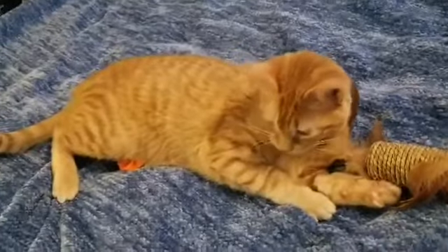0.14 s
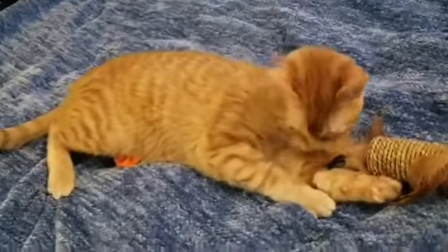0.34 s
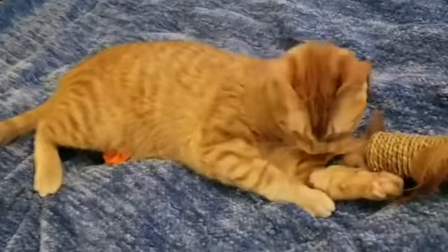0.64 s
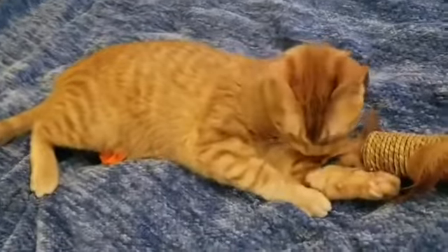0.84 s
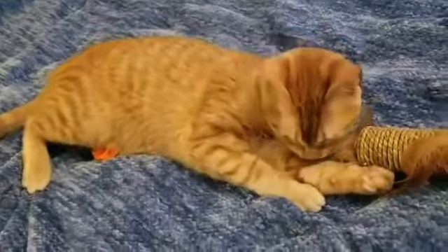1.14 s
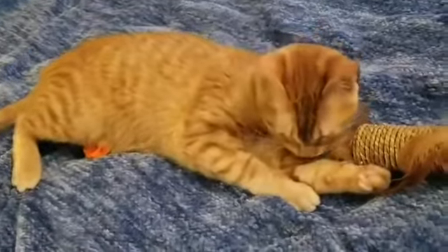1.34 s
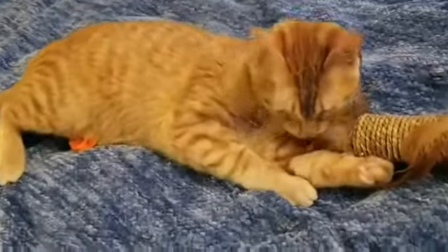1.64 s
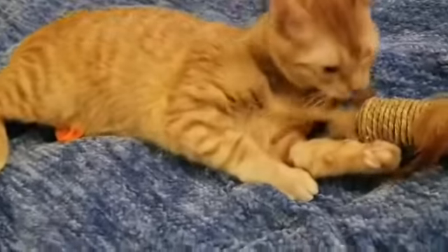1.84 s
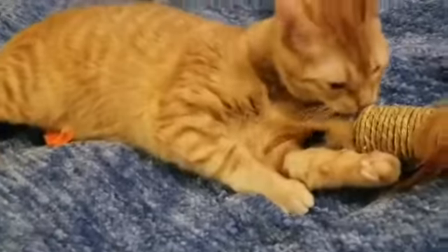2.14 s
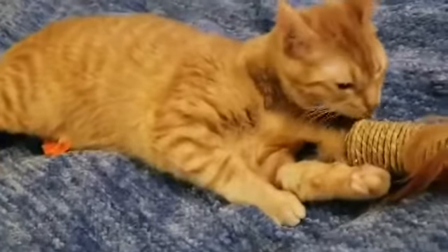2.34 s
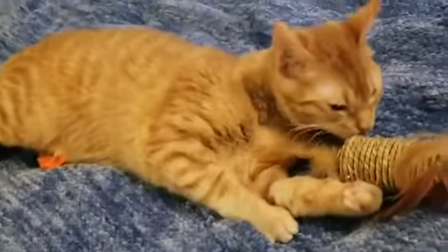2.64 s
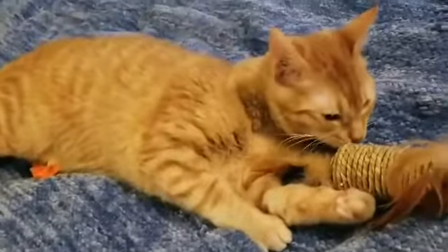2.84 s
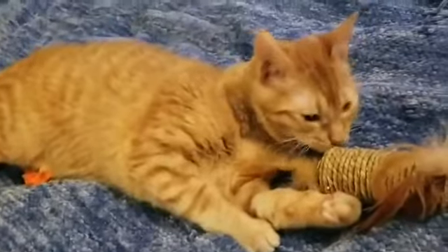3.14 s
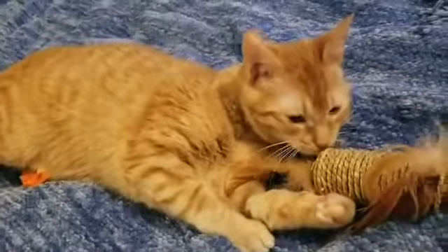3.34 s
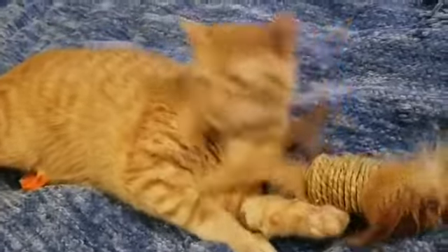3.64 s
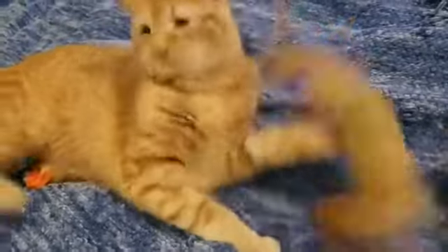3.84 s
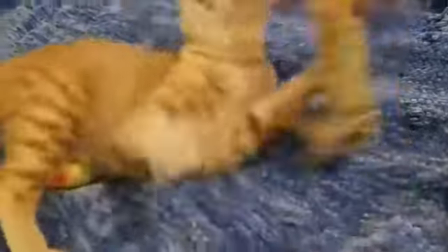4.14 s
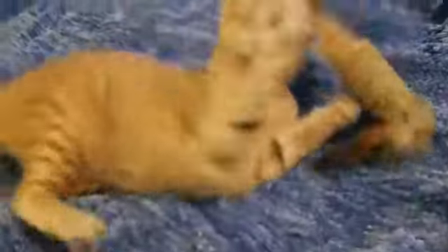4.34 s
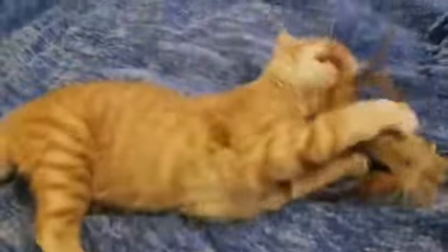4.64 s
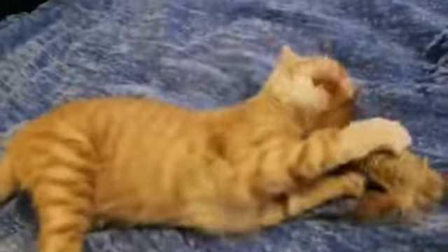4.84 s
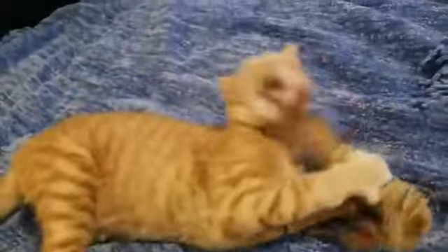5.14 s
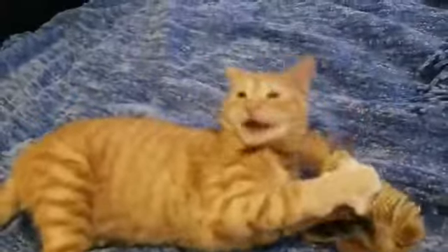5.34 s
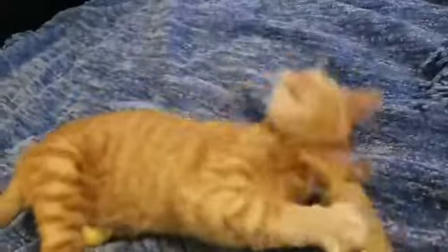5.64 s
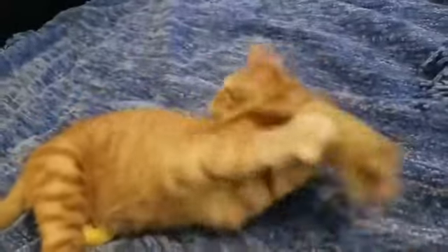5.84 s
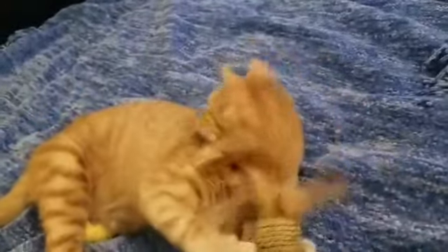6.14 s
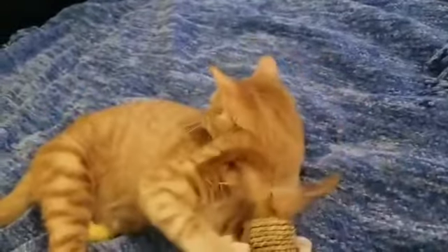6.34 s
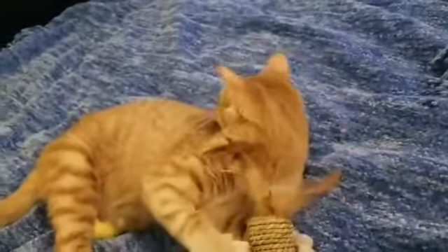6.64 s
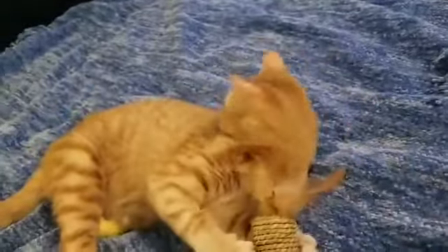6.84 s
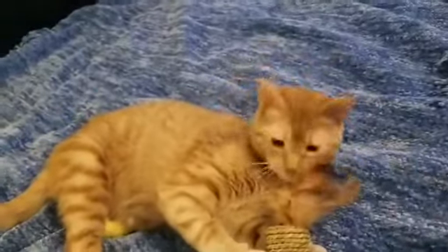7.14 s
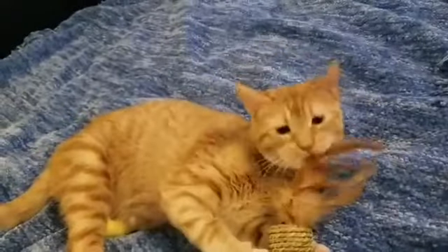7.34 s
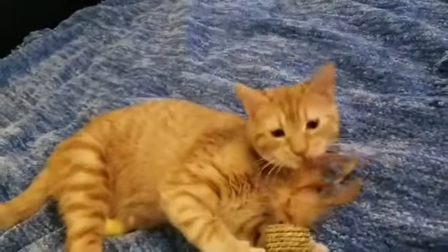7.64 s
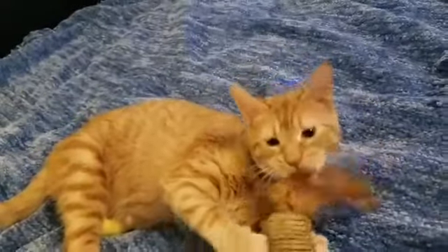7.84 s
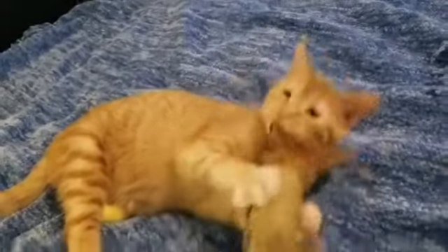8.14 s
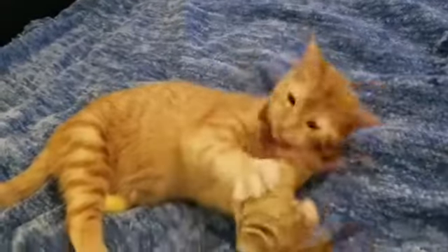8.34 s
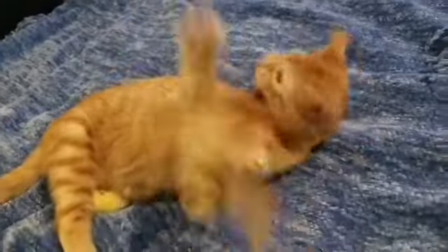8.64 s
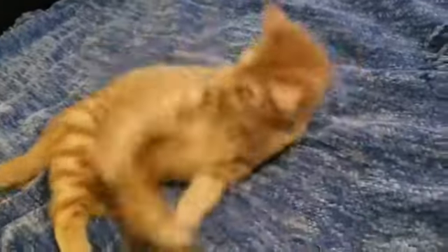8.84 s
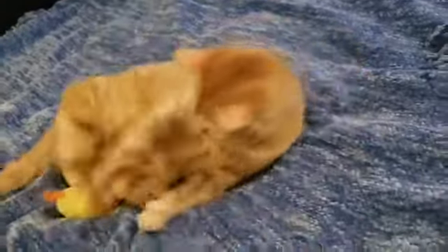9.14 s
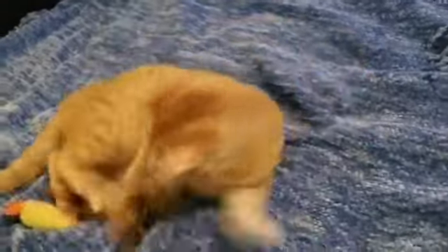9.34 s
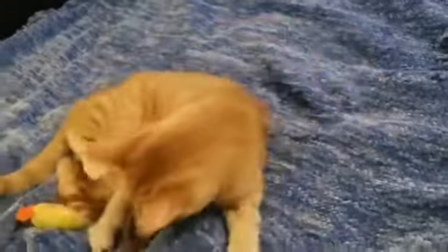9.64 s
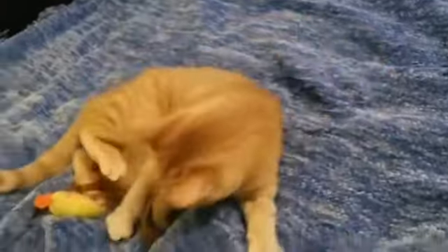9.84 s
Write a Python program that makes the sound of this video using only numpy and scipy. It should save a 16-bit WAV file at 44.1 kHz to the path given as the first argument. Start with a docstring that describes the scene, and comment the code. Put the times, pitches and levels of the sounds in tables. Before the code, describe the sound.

A tiny high bell jingles in bursts as a kitten wrestles a toy, with claws snapping on rope and light blanket rustling.

```python
"""Kitten with a belled toy

A kitten wrestles a feathered sisal toy on a blanket in a small room, close to a hand-held phone.
A pellet strikes and rolls inside a tiny bell, whose fur-damped shell chinks in bursts.
Claws pluck the rope and scratch the weave; feathers and cloth rustle by stick-slip friction.
The phone rubs and bumps in the hand, and an appliance hums in the background."""
import sys
import numpy as np
from scipy import signal
from scipy.fft import rfft, irfft, next_fast_len
from scipy.io import wavfile
from scipy.ndimage import uniform_filter1d

SR = 44100
rng = np.random.default_rng(int(sys.argv[2]) if len(sys.argv) > 2 else 0)


def file_out(sig):
    """Save sig as 16-bit WAV at sys.argv[1]."""
    # one column per channel
    cols = np.atleast_2d(sig).T
    # limit, then scale
    lim = np.clip(cols, -1, 1)
    pcm = np.round(lim * 32767).astype(np.int16)
    wavfile.write(sys.argv[1], SR, pcm)


N = 440118
TIME = np.arange(N) / SR

# Levels in the tables are relative: each source applies its own gains to them.
# Tones of the appliance. Each row: frequency in Hz, rms level in dB.
HUM_TONES = [(42, -70.5), (60, -67), (72.4, -66), (85, -69), (95.8, -67.5), (119.9, -52.5), (145, -68.5),
             (240, -84.5)]
# Spectra of the noises. Each row: frequency in Hz, spectral density in dB.
AIR_SPECTRUM = [(15, -25), (25, -18.5), (37, 9), (65, -5), (110, 5.5), (162, 4), (180, -5), (290, -8),
                (520, -24), (900, -28), (2100, -26), (2750, -31), (3700, -34.5), (5500, -21), (8500, -43),
                (12700, -22.5), (13400, -58.5)]
RUMBLE_SPECTRUM = [(15, -19.5), (32, 0.5), (52, 1), (110, 1.5), (165, 0.5), (230, -15), (400, -23),
                   (1000, -73)]
RUB_SPECTRUM = [(120, -19), (250, 6.5), (400, 2), (620, 0.5), (900, -8), (1150, -18), (1600, -13),
                (3000, -30)]
KNOCK_SPECTRUM = [(100, -61), (300, -11.5), (600, -2), (1000, -11), (1900, -17), (2300, -21.5), (2750, -16),
                  (3700, -25), (4300, -21.5), (5500, -33.5), (8000, -28.5), (12500, -24), (15000, -46.5)]
FEATHER_SPECTRUM = [(1200, -12), (2000, -4), (2800, 3.5), (3700, -3), (4500, 2.5), (5600, 1), (7200, -3),
                    (8600, -13.5), (10500, -6), (12500, 0), (14000, -11.5)]
CLOTH_SPECTRUM = [(150, -10), (330, -8.5), (560, -5.5), (750, -6), (1080, -4.5), (1350, -1.5), (1800, -4.5),
                  (2700, -11.5), (4000, -12.5)]
SCRAPE_SPECTRUM = [(2000, -22), (4000, -17.5), (5400, 4), (6300, -2), (7800, -6), (11000, -14),
                   (12500, -11.5), (14000, -26)]
# The hand shifts on the phone, and now and then the kitten's paws bump it. Each row: start and length in
# seconds, rumble and rub in dB.
GRIP_SHIFTS = [(0, 0.037, -43.5, -54.5), (.4, 0.21, -51.5, -62), (.65, 0.052, -50, -50.5),
               (.76, 0.65, -55.5, -66.5), (1.47, 0.2, -51, -54), (1.69, 0.12, -42.5, -60),
               (1.85, 0.53, -54.5, -70.5), (2.48, 0.21, -58.5, -71), (3.8, 0.081, -51, -77),
               (3.99, 0.14, -50.5, -61), (4.4, 0.02, -40.5, -56), (4.5, 0.18, -53, -69),
               (5.12, 0.42, -55, -69.5), (6.83, 0.08, -43, -60.5), (7.0, 0.093, -53, -69),
               (7.36, 0.079, -48, -58), (7.7, 0.33, -63, -69.5)]
# Soft bumps on the phone. Each row: start in seconds, knock, thud and tick in dB.
BUMPS = [(.668, -38, -56, -62), (1.742, -44.5, -36, -45), (2.127, -38, -35.5, -43), (2.139, -57, -38, -39),
         (2.166, -57, -32.5, -66), (2.342, -30.5, -25, -30), (2.354, -32, -19.5, -31),
         (2.403, -51, -34, -64)]
# Hollow modes of the phone's case. Each row: frequency in Hz, level in dB.
CASE_MODES = [(462, -3.5), (535, -3), (600, -2.5), (752, -6), (1040, -7), (1280, -12), (2660, -11.5),
              (2760, -12), (4300, -21)]
# The kitten bats, kicks and rolls. Each row: start and length in seconds, feathers and cloth in dB.
KITTEN_MOVES = [(0, 0.026, -57, -53.5), (.38, 0.022, -61.5, -58), (.48, 0.024, -52.5, -56.5),
                (.645, 0.048, -58, -48.5), (.77, 0.14, -59.5, -55.5), (.97, .04, -60, -62),
                (1.085, 0.041, -45.5, -57), (1.19, .14, -70.5, -67), (1.48, 0.17, -56, -57),
                (1.74, 0.024, -50, -54), (1.82, 0.12, -61.5, -63), (2.46, 0.13, -61, -64),
                (2.73, 0.17, -59.5, -67.5), (2.995, .1, -46, -60), (3.8, 0.13, -55, -69),
                (3.88, 0.032, -47, -65), (3.98, 0.079, -43, -53.5), (4.11, 0.19, -53, -54),
                (4.38, 0.028, -49.5, -52), (4.53, 0.039, -49, -57.5), (4.65, 0.052, -82, -55.5),
                (5.11, 0.13, -57, -66), (5.3, 0.43, -54.5, -62.5), (5.625, 0.035, -53.5, -58),
                (5.78, 0.17, -58, -69.5), (5.945, 0.064, -41.5, -59), (6.11, 0.023, -48, -51.5),
                (6.83, 0.17, -50, -59.5), (7.06, 0.082, -55.5, -80), (7.22, 0.15, -54.5, -68),
                (7.37, 0.063, -47.5, -60), (7.55, 0.06, -53.5, -71), (7.68, 0.048, -48, -75),
                (7.795, 0.24, -53.5, -77), (8.08, 0.051, -56, -84), (8.24, 0.032, -58, -83),
                (8.812, 0.027, -35.5, -40.5), (8.94, 0.043, -41, -51.5), (9.14, 0.041, -51.5, -57),
                (9.27, 0.12, -50, -52), (9.42, 0.083, -54.5, -51.5)]
# A claw drags over the weave. Each row: start and length in seconds, level in dB, resonance in Hz.
SCRATCHES = [(0.656, 0.037, -50, 854), (4.023, 0.042, -43.5, 1020), (4.124, .2, -57, 1060),
             (4.389, 0.025, -56, 1130), (4.64, 0.03, -63, 1250), (5.631, 0.04, -51, 1080),
             (6.14, 0.03, -47, 1060), (8.469, 0.089, -73.5, 2685), (8.648, .025, -62, 2780),
             (9.316, .06, -61, 1300), (9.422, 0.09, -54, 1270), (9.498, 0.06, -54.5, 1260)]
# Higher resonances of the weave. Each row: frequency and nominal width in Hz, level in dB.
WEAVE_MODES = [(2860, 490, -9.5), (3110, 130, -10), (4680, 350, -10.5), (5290, 430, -8.5)]
# Claws and teeth catch hard on the rope. Each row: start in seconds, levels of snap, body and
# bright edge in dB, left minus right in dB, pitch of the fibre in Hz.
ROPE_SNAPS = [(0.695, -34, -36.5, -37, -9, 5800), (0.788, -36, -62, -37, -1, 5040),
              (0.797, -40, -67, -33, -4.0, 4760), (0.831, -55, -58.0, -36.5, -5.0, 2390),
              (1.102, -29.5, -63, -32.0, -12.0, 5250), (1.747, -34.5, -65.0, -50.0, 5.0, 2840),
              (2.999, -28.5, -56.5, -28.5, -9, 5950), (3.616, -63, -68.0, -29.5, -2, 2690),
              (3.89, -37, -71, -46.5, -11.5, 2630), (3.95, -20.5, -51.5, -47, -1.5, 4320),
              (3.981, -19.5, -33.5, -27, -4.5, 4660), (3.993, -18.5, -43, -30, -1, 6150),
              (4.006, -21.5, -41, -42, -4.5, 4600), (4.017, -23.5, -39, -33.5, 1, 5190),
              (4.035, -22.5, -32, -25.5, -0.5, 2710), (4.053, -17.5, -34.5, -29.5, -2.5, 5860),
              (4.103, -40, -53, -45, -1.5, 4840), (4.217, -35.5, -46, -40.0, -8, 5570),
              (4.241, -32.5, -44, -35, -6, 4740), (4.53, -43, -65.0, -45, -11, 4220),
              (4.575, -40.5, -59.5, -54, -6, 5470), (5.045, -39, -71, -35.5, -5, 5700),
              (5.12, -36, -73.0, -37.5, 1.0, 4950), (5.148, -39, -54, -48.0, 1.0, 3810),
              (5.169, -31, -50, -27, 0, 3670), (5.206, -26.5, -61, -31, -7, 5070),
              (5.269, -32.0, -68.0, -37, 2, 5130), (5.311, -42, -72.0, -27, -1, 4440),
              (5.364, -39, -70.0, -35.0, -2, 5580), (5.437, -35.5, -68.0, -38.0, 10, 4350),
              (5.633, -37, -50.0, -35, -4.0, 2800), (5.65, -40, -45, -37, -2, 2780),
              (5.874, -36.5, -65.0, -39, -10, 4660), (5.95, -34.0, -64, -38, -6.0, 2840),
              (5.97, -28, -51.0, -38, -13, 3100), (5.987, -33, -56.0, -40.0, -12.0, 2970),
              (5.998, -33, -57.0, -46, -11.0, 2820), (6.024, -26, -62.0, -31, -9.0, 6100),
              (6.069, -33.5, -47.0, -40, 0, 3100), (6.122, -31, -65, -46.0, -5.0, 3130),
              (6.133, -34, -52, -36, -2.0, 2710), (6.152, -36.0, -53, -50, -3, 2560),
              (6.166, -30, -35, -44, -1.5, 2700), (6.827, -25, -69, -23, -4, 4820),
              (7.002, -24, -62, -29.0, -5, 3600), (7.203, -39, -70, -42, 3, 3640),
              (7.23, -36, -72.0, -37.0, -2.0, 4140), (7.267, -33.5, -64, -36, -2, 3620),
              (7.506, -32.5, -58.5, -40.5, -5.5, 2730), (7.526, -35.5, -66, -43, 4, 2680),
              (7.619, -37, -66, -58.5, -7, 2740), (7.698, -28, -64, -41, 0.0, 3600),
              (7.81, -34.5, -63, -38.0, -9, 3460), (7.817, -29, -65, -40, 2, 3600),
              (7.842, -31, -73, -45, 0.0, 3470), (7.864, -31, -72, -30, 2, 5950),
              (7.905, -32.0, -70.0, -44.0, -2.0, 4100), (7.942, -26.5, -70.0, -37, 1, 5100),
              (7.958, -21.5, -62, -34, -2.0, 5810), (8.018, -32.5, -73.0, -38, 6, 5840),
              (8.061, -30, -75, -39, -3, 4140), (8.539, -48, -78.0, -51, -2.5, 2710),
              (8.821, -34, -33.0, -37.5, -11.5, 2690), (8.827, -26, -44, -28.0, -7, 5940),
              (8.832, -24.5, -31, -36.5, -12, 3170), (8.835, -15, -27.5, -14.0, 1.5, 4940),
              (8.863, -40.5, -43, -23, -7, 2910), (8.947, -30.5, -34, -35, 0, 3100),
              (8.976, -25, -38.5, -46.5, 3, 3160), (9.155, -41.5, -64, -62.0, -21, 2970),
              (9.174, -35, -50.5, -61.0, 3, 2780), (9.276, -32.5, -44.0, -30, -5.0, 2730),
              (9.379, -38, -43, -41, 5, 2880)]
# The pellet rolls round the shell. Each row: start and length in seconds, ring and scrape in dB.
PELLET_ROLLS = [(0, 0.024, -39, -57), (.12, 0.033, -63, -48), (.23, 0.094, -50, -61), (.36, 0.05, -53, -53),
                (.645, 0.033, -52, -66), (.72, 0.052, -42, -60), (.98, 0.015, -42, -60),
                (1.12, 0.017, -60, -65), (1.19, 0.046, -64, -58), (1.47, 0.18, -49, -60),
                (1.73, 0.17, -50, -71), (1.92, 0.033, -42, -70), (2.75, 0.22, -46, -64),
                (3.03, 0.026, -40, -39), (3.15, 0.044, -45, -60), (3.3, 0.12, -56.5, -64),
                (5.24, 0.32, -54, -62), (6.35, 0.21, -55, -65), (6.64, 0.099, -60, -58),
                (6.73, 0.041, -50, -59), (6.89, 0.075, -43, -69), (7.1, .05, -37, -50),
                (7.37, 0.43, -49, -74), (7.73, 0.25, -40.5, -66), (8.07, 0.095, -55.5, -63)]
# The pellet strikes the shell. Each row: start in seconds, levels of upper modes, lower modes,
# contact tick and bright top in dB, time for the upper modes to fall 60 dB in seconds.
PELLET_STRIKES = [(0.042, -29, -42, -47, -32, 0.064), (0.078, -44, -38, -45, -50, 0.032),
                  (.103, -13, -36, -28, -19.5, .018), (.114, -26, -46, -32.5, -35, 0.02),
                  (0.152, -19, -50, -45, -39, 0.045), (.163, -17.5, -43, -35, -60, 0.05),
                  (0.211, -37, -41, -45, -37, 0.023), (0.226, -50, -55, -43, -52, .02),
                  (0.243, -46, -61, -44, -62, .03), (.344, -35, -53, -49, -41, 0.029),
                  (0.381, -40, -38, -42, -48, 0.022), (0.4, -42, -47, -44, -36, 0.015),
                  (0.464, -32, -30, -47, -44, 0.0059), (0.629, -30.5, -40, -38, -53, 0.034),
                  (0.654, -26.5, -56, -47, -67, 0.073), (.648, -28, -46, -52, -50, 0.044),
                  (0.68, -31.5, -43, -50, -58, 0.046), (.737, -39, -38, -55, -65, .045),
                  (.773, -43, -44, -37, -52, 0.039), (.854, -15, -29, -25.5, -13.5, 0.037),
                  (.876, -46, -34, -32, -39, .03), (.937, -25.5, -29, -37, -46, 0.032),
                  (0.972, -41, -47, -31.5, -36, 0.012), (0.993, -37, -53, -43, -60, .02),
                  (1.001, -34, -44, -34, -57, .025), (1.054, -35, -55, -42, -51, 0.033),
                  (1.125, -48, -48, -47, -52, .02), (1.131, -34, -48, -55, -56, .03),
                  (1.145, -29.5, -40, -49, -32, 0.052), (1.189, -34, -35, -40, -36, 0.033),
                  (1.232, -32.5, -45, -39, -30, .03), (1.238, -37, -46, -39.5, -35, .02),
                  (1.261, -37, -58, -34, -31, 0.013), (1.289, -20, -33, -30, -39, 0.021),
                  (1.315, -31.5, -45, -40, -61, 0.029), (1.326, -40, -54, -40.5, -64, 0.022),
                  (1.431, -40, -59, -39, -35, 0.016), (1.508, -36.5, -23, -41, -30, 0.054),
                  (1.569, -41, -37, -60, -65, 0.064), (1.611, -25, -43, -46, -46, 0.033),
                  (1.62, -34, -45, -40.5, -54, 0.033), (1.708, -31.5, -33, -41.5, -49, 0.068),
                  (1.838, -32.5, -41, -52, -60, 0.053), (2.737, -34, -46, -42, -36, 0.018),
                  (2.746, -26, -43, -39, -48, 0.015), (2.85, -25.5, -31, -35, -31, 0.019),
                  (2.866, -31, -46, -44, -47, 0.13), (2.897, -28, -46, -47, -45, 0.047),
                  (2.911, -32, -36, -43, -46, .06), (2.952, -23.5, -46, -42, -53, 0.022),
                  (3.004, -19.5, -20, -28, -23, 0.035), (3.011, -22, -25, -24.5, -18, 0.02),
                  (3.021, -16, -27, -30, -28, 0.16), (3.056, -18.5, -34, -36, -36.5, 0.051),
                  (3.072, -32, -30, -32, -24, 0.033), (3.096, -29, -46, -50, -44, 0.025),
                  (3.129, -11, -24, -34, -20, 0.045), (3.224, -26, -38, -40.5, -37, 0.036),
                  (5.212, -37, -33, -24.5, -33, .04), (5.23, -49, -33, -41, -33, .04),
                  (5.295, -27, -42.5, -31.5, -18, 0.015), (5.334, -31.5, -50, -40, -30, 0.061),
                  (5.449, -34.5, -60, -44, -37, 0.033), (5.484, -33, -57, -55, -59, 0.066),
                  (5.551, -27, -58, -44, -40, 0.04), (6.371, -54, -61, -56, -60, .03),
                  (6.392, -45, -57, -47, -46, 0.041), (6.418, -48, -56, -47, -60, .04),
                  (6.466, -39, -36, -49, -44, 0.049), (6.493, -49, -51, -41, -57, .02),
                  (6.506, -39, -49, -41, -46, 0.022), (6.517, -56, -56, -42, -56, .02),
                  (6.603, -41, -54, -32, -40, 0.02), (6.642, -49, -56, -43, -52, .02),
                  (6.648, -44, -55, -44, -49, .02), (6.659, -35, -50, -34, -39, .02),
                  (6.667, -38, -54, -42, -46, 0.023), (6.685, -48, -52, -50, -44, .02),
                  (6.692, -39, -34, -29.5, -34, 0.014), (6.709, -46, -47, -33.5, -39, .025),
                  (6.727, -37, -46, -44, -41, .04), (6.744, -38, -54, -45, -52, 0.049),
                  (6.8, -35, -40, -42, -41, 0.028), (6.807, -34, -54, -62, -37, 0.027),
                  (6.821, -29, -32, -35, -29, 0.042), (6.853, -19, -15.5, -34, -23, 0.049),
                  (6.877, -16.5, -23, -49, -35, 0.037), (6.907, -28, -46, -50, -49, .04),
                  (6.936, -26, -48, -22.5, -22, 0.017), (6.944, -19, -14.5, -22.5, -24, 0.026),
                  (6.967, -28, -29, -27.5, -27, 0.066), (6.982, -28, -37.5, -45, -33, .04),
                  (6.992, -34, -39, -48, -47, .03), (7.031, -29.5, -40, -32.5, -33, 0.029),
                  (7.061, -24, -43, -32.5, -32, 0.059), (7.075, -30, -40, -55, -39, 0.035),
                  (7.097, -24, -27, -29, -28, 0.037), (7.112, -25.5, -27, -34, -28, 0.047),
                  (7.133, -35, -37, -35, -44, .03), (7.14, -29, -31, -41, -40, 0.021),
                  (7.225, -34, -45, -36.5, -47, 0.031), (7.243, -39, -34, -43, -44, 0.027),
                  (7.28, -37, -36, -45, -31, 0.044), (7.334, -42, -41, -35.5, -43, 0.056),
                  (7.347, -37, -41, -52, -55, 0.037), (7.389, -25, -41.5, -35.5, -32, 0.03),
                  (7.397, -31, -42, -52, -45, 0.02), (7.413, -40, -28, -39, -33, 0.017),
                  (7.433, -23, -39, -45, -30, .04), (7.445, -31, -45, -44, -39, 0.031),
                  (7.512, -28, -49, -47, -40, 0.058), (7.53, -30, -50, -33, -34, 0.026),
                  (7.559, -27, -43, -33, -38, 0.037), (7.567, -28, -44, -34, -35, 0.034),
                  (7.586, -36, -54, -44, -56, .025), (7.634, -29, -46, -36, -29, 0.045),
                  (7.671, -32, -47, -46, -50, .025), (7.688, -22.5, -33, -29.5, -29, 0.049),
                  (7.716, -9.5, -28, -27.5, -25, 0.046), (7.735, -17, -35, -52, -29, .03),
                  (7.764, -45, -51, -50, -36, .03), (7.796, -38, -25, -34, -32, 0.041),
                  (7.816, -34, -39, -37, -39, .025), (7.873, -37, -52, -36, -47, .025),
                  (7.887, -37, -41, -41, -40, 0.033), (7.921, -25.5, -50, -32.5, -25, 0.046),
                  (7.99, -40, -54, -51, -45, 0.033)]
# Modes of the bell: two ringing groups, then the quickly damped clink and its bright top.
# Each row: frequency in Hz, level in dB.
UPPER_MODES = [(9812, 0), (9960, -13), (9500, -19), (9800, -16)]
LOWER_MODES = [(8835, 23), (8925, -5.5), (9090, -8)]
CLINK_MODES = [(5210, -5.5), (5420, -3.5), (5720, -5), (6100, -11.5), (7540, -13.5)]
TOP_MODES = [(11150, -2.6), (11850, -2), (12400, 0), (12800, -2)]
# Where the bell lies between the microphones. Each row: time in seconds, left minus right in dB.
BELL_PATH = [(0, -8), (.9, -8), (1.15, -3), (1.55, -6), (1.8, 7), (2.75, 0), (3.05, 3.5), (5.4, 12.5),
             (6.9, 5.5), (7.5, 9.5), (8.0, 1)]
# Resonances of the right microphone port. Each row: frequency and width in Hz, level in dB.
PORT_RESONANCES = [(2590, 630, 6.5), (4420, 170, -2), (6240, 820, -14)]
# The phone's treble roll-off. Each row: frequency in Hz, gain in dB.
TREBLE_RESPONSE = [(0, 0), (13000, 0), (13500, -11), (14500, -19), (16000, -32), (SR / 2, -60)]

BODY_HZ, SNAP_HZ, ROPE_HZ = (820, 1400), (2400, 7000), (2900, 6800)
EDGE_HZ, TOP_HZ = (8000, 13400), (11000, 13400)
RELEASE_DB_PER_S, QUICK_STOP_DB_PER_S = 159.5, 320


def undb(db):
    """Amplitude ratio of a level in decibels."""
    return 10 ** (np.asarray(db) / 20)


def unit(x):
    """Normalisation to rms 1."""
    return x / np.sqrt(np.mean(x ** 2))


def unit_peak(x):
    """Normalisation to the power of a unit sine over the loudest millisecond."""
    return x / np.sqrt(2 * uniform_filter1d(np.mean(x ** 2, axis=0), size=44).max())


def pan(left_db):
    """Constant-power panning: two gains that differ by left_db."""
    gains = undb(np.array([[.5], [-.5]]) * left_db)
    return gains / np.sqrt(np.mean(gains ** 2, axis=0))


def noise(size, side_db):
    """White stereo noise; the weaker its side part, the more coherent the channels."""
    mid, side = rng.standard_normal((2, size))
    return unit(mid + undb(side_db) * side * np.array([[1], [-1]]))


def colour(x, spectrum):
    """Spectral shaping, interpolated over log frequency, to rms 1."""
    hz, db = np.transpose(spectrum)
    size = next_fast_len(x.shape[-1])
    bins_hz = np.maximum(np.arange(size // 2 + 1) * SR / size, 1)
    gain = undb(np.interp(np.log(bins_hz), np.log(hz), db, right=-80))
    return unit(irfft(rfft(x, size) * gain, size)[..., :x.shape[-1]])


def band(x, lo_hz, hi_hz):
    """Causal band-pass filtering."""
    return signal.sosfilt(signal.butter(2, [lo_hz, hi_hz], "band", fs=SR, output="sos"), x)


def resonate(x, hz, width_hz):
    """Forced response of one resonator, gain 1 at its centre."""
    return signal.lfilter(*signal.iirpeak(hz, hz / width_hz, fs=SR), x)


def relax(pulses, decay_s):
    """Exponential relaxation after each pulse, with time constant decay_s."""
    return signal.lfilter([1], [1, -np.exp(-1 / (decay_s * SR))], pulses)


def add(out, at, sound):
    """Superposition of a sound at a time in seconds."""
    i = max(int(at * SR), 0)
    out[:, i:i + sound.shape[-1]] += sound[:, :max(N - i, 0)]


def crack(band_hz, t60, side_db):
    """A transient: exponentially decaying noise confined to one band."""
    t = TIME[:SR // 20]
    return unit_peak(band(noise(len(t), side_db) * undb(-60 * t / t60), *band_hz))


def contact(band_hz, t60, rattle=0.85):
    """A hard impact divides its energy between an instant click and a short rattle."""
    click = crack(band_hz, t60=.0045, side_db=-2)
    return np.sqrt(1 - rattle ** 2) * click + rattle * crack(band_hz, t60, side_db=-2)


def ring(modes, t60, detune=0.0027, phase_rad=1.0, rise_s=0.00069, uneven_db=0):
    """Free vibration: modes decay together, each reaching the two ports with its own phase."""
    t = TIME[:int(SR * np.clip(t60, .01, .2))]
    hz, db = np.transpose(modes)
    mistuning, onset, skew, spot = rng.standard_normal((len(hz), 4)).T
    phase = 2 * np.pi * (hz * (1 + detune * mistuning))[:, None] * t + onset[:, None]
    gains = undb(db + uneven_db * spot)  # the struck spot favours some modes
    ports = np.array([gains @ np.sin(phase + sign * phase_rad * skew[:, None]) for sign in (1, -1)])
    return unit_peak(ports * undb(-60 * t / t60) * (1 - np.exp(-t / rise_s)))


def impulses(per_s, spread_db, cap):
    """A Poisson train of impulses whose levels span cap times spread_db."""
    sizes = undb(spread_db * np.minimum(rng.exponential(size=N), cap))
    return sizes * (rng.random(N) < per_s / SR)


def friction(per_s, spread_db, smooth_db, side_db):
    """Stick-slip friction: many tiny slips of uneven size over a smooth hiss."""
    slips = relax(impulses(per_s, spread_db, cap=4), decay_s=.0008)
    return noise(N, side_db) * (unit(slips) + undb(smooth_db))


def gesture(start, length, release_db_per_s, attack_s=0.0056, slacken_db=3):
    """Envelope of a movement: a quick rise, a slackening hold and an exponential decay."""
    t = TIME - start
    fall_db = slacken_db * np.clip(t / length, 0, 1) + release_db_per_s * np.clip(t - length, 0, 1)
    return np.clip(t / attack_s, 0, 1) * undb(-fall_db)


def envelopes(moves, release_db_per_s=RELEASE_DB_PER_S):
    """Incoherent movements add in power, giving an envelope for each of their two levels."""
    power = np.zeros((2, N))
    for start, length, *levels_db in moves:
        power += np.outer(undb(levels_db), gesture(start, length, release_db_per_s)) ** 2
    return np.sqrt(power)


def background(air_db=-59.5):
    """Steady mains and motor tones lie over the room's air noise, most coherent in the bass."""
    hum = sum(np.sqrt(2) * undb(db) * np.sin(2 * np.pi * (hz * TIME + rng.random()))
              for hz, db in HUM_TONES)
    mid, side = rng.standard_normal((2, N))
    side = undb(-8) * side + undb(-2.5) * band(side, 450, 16000)
    return hum + undb(air_db) * colour(mid + side * np.array([[1], [-1]]), AIR_SPECTRUM)


def hand():
    """Structure-borne sound: skin rubs the phone, and bumps shake it and excite its case modes."""
    rumble = colour(noise(N, side_db=-30), RUMBLE_SPECTRUM)
    rub = colour(friction(per_s=300, spread_db=1.55, smooth_db=-2.6, side_db=-15.5), RUB_SPECTRUM)
    rumble_gain, rub_gain = envelopes(GRIP_SHIFTS)
    out = rumble * rumble_gain + rub * rub_gain
    t = TIME[:SR // 2]
    knock_t60, thud_t60, thud_rise_s = 0.25, 0.33, 0.002
    for at, knock_db, thud_db, tick_db in BUMPS:
        knock = colour(noise(len(t), -6), KNOCK_SPECTRUM) * undb(knock_db - 7 - 60 * t / knock_t60)
        thud = colour(noise(len(t), -26), RUMBLE_SPECTRUM) * undb(thud_db - 3 - 60 * t / thud_t60)
        add(out, at, knock + thud * (1 - np.exp(-t / thud_rise_s)))
        add(out, at, undb(knock_db) * ring(CASE_MODES, t60=0.13, detune=0.0077, phase_rad=0.24))
        tick = undb(-3) * crack(SNAP_HZ, t60=0.015, side_db=5.4) + crack(EDGE_HZ, t60=0.018, side_db=2)
        add(out, at, undb(tick_db) * tick)
    return out


def room(x, t60=0.16, wet_db=-15):
    """Reverberation: a small furnished room adds a short diffuse tail, different in each channel."""
    t = TIME[:SR // 2]
    tail = rng.standard_normal((2, len(t))) * undb(-60 * t / t60) * (t > .004)
    tail /= np.sqrt(np.sum(tail ** 2, axis=1, keepdims=True))
    return x + undb(wet_db) * signal.fftconvolve(x + x[::-1] / 2, tail, axes=1)[:, :N]


def flicker(x, per_s, depth_db=5.52):
    """Random amplitude modulation: ever new fibres touch, so each band swells and fades by itself."""
    size = next_fast_len(N)
    spectrum, hz = rfft(x, size), np.arange(size // 2 + 1) * SR / size
    centres_hz = np.geomspace(500, 13000, num=14)
    out = np.zeros((2, N))
    for weights in np.eye(len(centres_hz)):
        part = irfft(spectrum * np.interp(hz, centres_hz, weights), size)[:, :N]
        knots_db = depth_db * rng.standard_normal(int(N / SR * per_s) + 2)
        out += part * undb(np.interp(TIME * per_s, np.arange(len(knots_db)), knots_db))
    return unit(out)


def rustle(feather_gain, cloth_gain, still_s=9.6):
    """Friction noise: feathers and rope crackle while the body drags over the blanket."""
    # between moves the fur still brushes lightly, until the kitten lies still
    restless = np.interp(TIME, [still_s, still_s + 0.04], [1, 0])
    feather_gain = np.hypot(feather_gain, undb(-67) * restless)
    cloth_gain = np.hypot(cloth_gain, undb(-73.5) * restless)
    # light contact is a smooth brushing; hard contact breaks into slips
    grip = np.clip(feather_gain / undb(-60.5), 0, 1)
    slips = unit(friction(per_s=600, spread_db=2.3, smooth_db=-4, side_db=-1))
    texture = grip * slips + np.sqrt(1 - grip ** 2) * noise(N, side_db=-0.11)
    feathers = flicker(colour(texture, FEATHER_SPECTRUM), per_s=40)
    drag = friction(per_s=300, spread_db=1.8, smooth_db=1, side_db=-2.5)
    blanket = flicker(colour(drag, CLOTH_SPECTRUM), per_s=28)
    return undb(-1) * (feathers * feather_gain + blanket * cloth_gain)


def twang(hz):
    """A plucked fibre vibrates for an instant at its pitch and at a weaker, random one."""
    return ring([(hz, 0), (rng.uniform(*SNAP_HZ), -6)], t60=.009, rise_s=.0001)


def claw_catches(effort, per_s=10, scatter_db=8, limit_db=-52):
    """Random plucking: claws catch the rope, more strongly as the kitten works harder, up to a limit."""
    out = np.zeros((2, N))
    sides = pan(left_db=-2)
    for when, *sizes in rng.random((int(N / SR * per_s), 4)):
        at = when * N / SR
        strength = min(effort[int(when * N)], undb(limit_db))
        snap, edge, body = strength * undb(np.array([-2, -5, -14]) + scatter_db * np.array(sizes))
        click = edge * contact(EDGE_HZ, t60=0.012) + body * crack(BODY_HZ, t60=0.0066, side_db=-0.5)
        add(out, at, click * sides)
        add(out, at, snap * twang(rng.uniform(*ROPE_HZ)) * sides)
    return out


def scratches(threads_per_s=220, spread_db=3, slip_t60=.005, nominal_width_hz=120):
    """Stick-slip excitation: a claw jumps from thread to thread, and each slip rings the taut weave."""
    out = np.zeros((2, N))
    size = SR // 2
    for start, length, db, hz in SCRATCHES:
        slips = undb(spread_db * rng.standard_normal(size)) * (rng.random(size) < threads_per_s / SR)
        drive = noise(size, side_db=-6) * relax(slips, slip_t60 / np.log(1000))
        weave = sum(undb(mode_db) * resonate(resonate(drive, mode_hz, 2 * width), mode_hz, 2 * width)
                    for mode_hz, width, mode_db in [(hz, nominal_width_hz, 0)] + WEAVE_MODES)
        envelope = undb(db) * gesture(0, length, QUICK_STOP_DB_PER_S)[:size]
        add(out, start, unit(weave) * envelope * pan(left_db=-1))
    return out


def rope_snaps():
    """Sudden release of tension: rope fibres let go with a dry snap, each at its own pitch."""
    out = np.zeros((2, N))
    for at, snap_db, body_db, edge_db, left_db, hz in ROPE_SNAPS:
        body = undb(body_db + 1) * crack(BODY_HZ, t60=0.0055, side_db=-18)
        snap = undb(snap_db - 6) * contact((hz / 1.56, hz * 1.8), t60=0.015, rattle=0.35)
        edge = undb(edge_db - 1) * contact(EDGE_HZ, t60=0.016, rattle=0.7)
        sides = pan(left_db + 2)
        add(out, at, (body + snap + edge) * sides)
        add(out, at, undb(snap_db - 4) * twang(hz) * sides)
    return out


def bell_pan(at, share=1):
    """The bell's position sets a level difference between the channels; share scales it."""
    return pan(share * np.interp(at, *np.transpose(BELL_PATH)))


def pellet_rolls(t60=.028):
    """Rolling contact: a chatter of tiny impacts scrapes the shell and briefly excites its modes."""
    touches = impulses(per_s=100, spread_db=4, cap=3)
    shell = ring(UPPER_MODES, t60) + undb(-8) * ring(LOWER_MODES, t60)
    ringing = unit(signal.fftconvolve(touches[None], shell, axes=1)[:, :N])
    scraping = colour(noise(N, side_db=-1.2) * relax(touches, decay_s=0.00087), SCRAPE_SPECTRUM)
    ring_gain, scrape_gain = envelopes(PELLET_ROLLS, QUICK_STOP_DB_PER_S)
    return (undb(-3.5) * ringing * ring_gain * bell_pan(TIME)
            + undb(-2) * scraping * scrape_gain * bell_pan(TIME, share=.5))


def bell_strikes(max_graze_s=.003, max_bounce_s=0.0083, graze_db=-17, bounce_db=-13, linger_db=-23):
    """Impact excitation: the pellet grazes, strikes and bounces on a shell whose modes the fur damps."""
    out = np.zeros((2, N))
    for at, upper_db, lower_db, tick_db, top_db, t60 in PELLET_STRIKES:
        early, late = rng.uniform(0.38, 1, size=2)
        wide, narrow = bell_pan(at), bell_pan(at, share=.5)
        tick = undb(tick_db - 9) * contact(SNAP_HZ, t60=0.033, rattle=0.28)
        tick += undb(top_db - 4) * contact(TOP_HZ, t60=0.0093, rattle=0.44)
        # once the fur lets go, the shell sings on faintly
        for modes, db in (UPPER_MODES, upper_db), (LOWER_MODES, lower_db):
            afterring = ring(modes, t60=0.17, detune=.0015, rise_s=0.0029)
            add(out, at, undb(db + linger_db) * afterring * wide)
        for delay, touch_db in (-max_graze_s * early, graze_db), (0, 0), (max_bounce_s * late, bounce_db):
            upper = ring(UPPER_MODES, t60, detune=.003, phase_rad=0.67, rise_s=0.00012)
            lower = ring(LOWER_MODES, 0.66 * t60, detune=0.0018, phase_rad=0.95)
            clink = ring(CLINK_MODES, 0.012, detune=0.017, phase_rad=0.71, rise_s=0.00012, uneven_db=4)
            top = ring(TOP_MODES, 0.0099, detune=0.019, phase_rad=0.91, rise_s=.0002, uneven_db=4)
            for sound in undb(upper_db - 1) * upper, undb(lower_db - 6) * lower:
                add(out, at + delay, undb(touch_db) * sound * wide)
            for sound in tick, undb(tick_db - 1) * clink, undb(top_db - 5) * top:
                add(out, at + delay, undb(touch_db) * sound * narrow)
    return out


def scene():
    """Superposition: the kitten's play reverberates in the room; hand and background add directly."""
    feather_gain, cloth_gain = envelopes(KITTEN_MOVES)
    bell = bell_strikes() + pellet_rolls()
    claws = rope_snaps() + scratches() + claw_catches(feather_gain)
    return room(bell + claws + rustle(feather_gain, cloth_gain)) + hand() + background()


def record(dry, cutoff_hz=15300):
    """Frequency response of the phone: the right port resonates; the treble rolls off and is cut."""
    left, right = dry
    right = right + sum(undb(db) * resonate(right, hz, width) for hz, width, db in PORT_RESONANCES)
    hz, db = np.transpose(TREBLE_RESPONSE)
    size = next_fast_len(N)
    gain = undb(np.interp(np.arange(size // 2 + 1) * SR / size, hz, db))
    heard = irfft(rfft(np.array([left, right]), size) * gain, size)[:, :N]
    return signal.sosfilt(signal.ellip(8, .2, 70, cutoff_hz, fs=SR, output="sos"), heard)


dry = scene()
out = record(dry)
file_out(out)
```